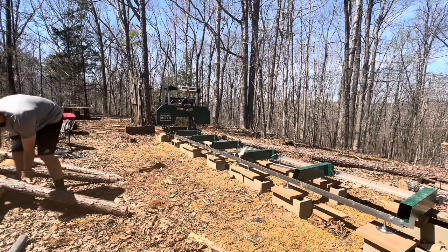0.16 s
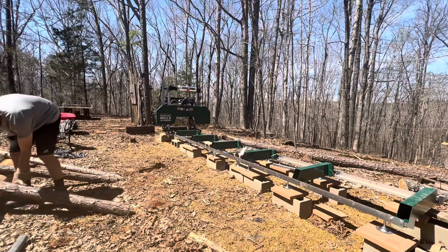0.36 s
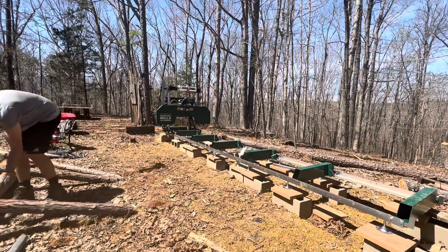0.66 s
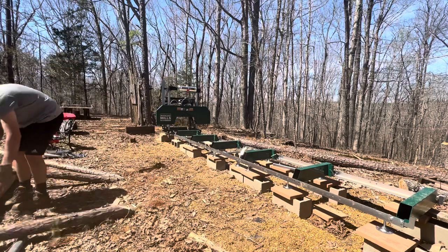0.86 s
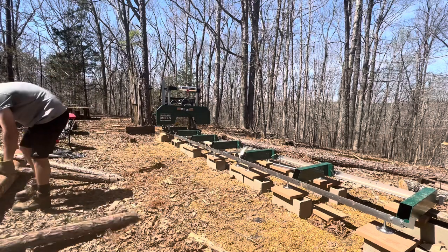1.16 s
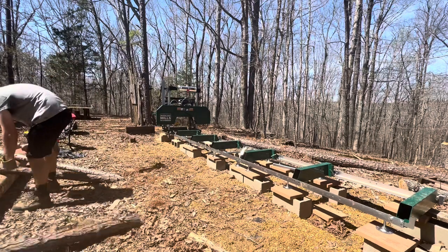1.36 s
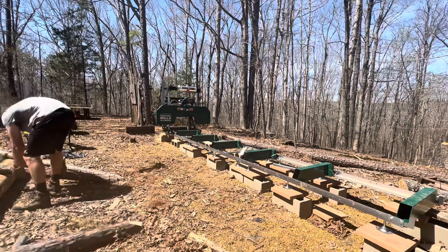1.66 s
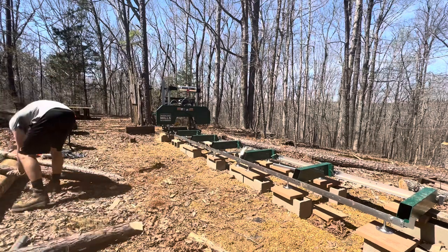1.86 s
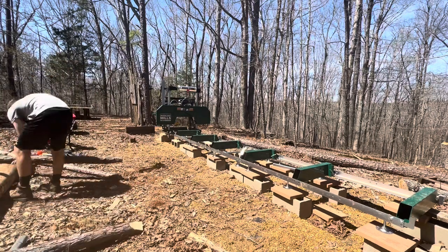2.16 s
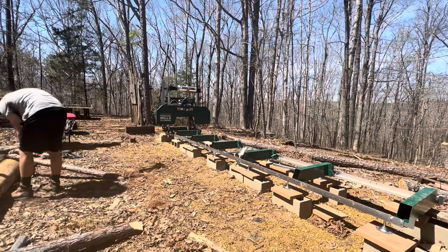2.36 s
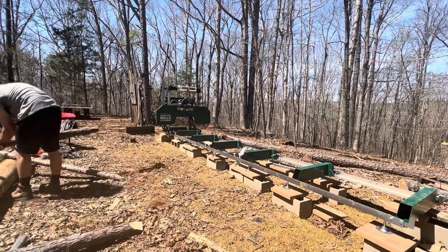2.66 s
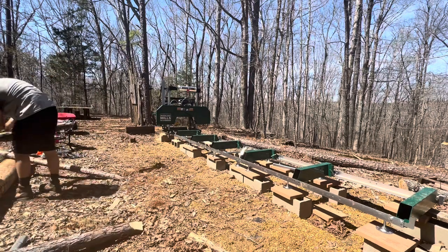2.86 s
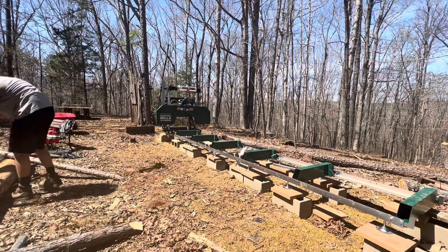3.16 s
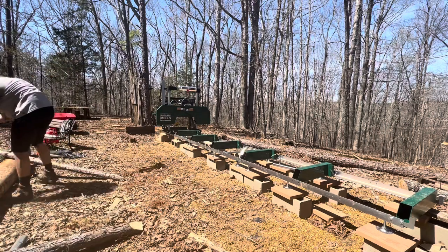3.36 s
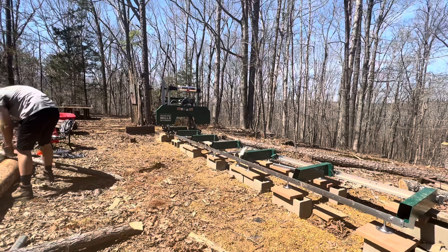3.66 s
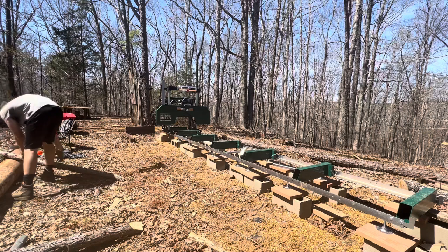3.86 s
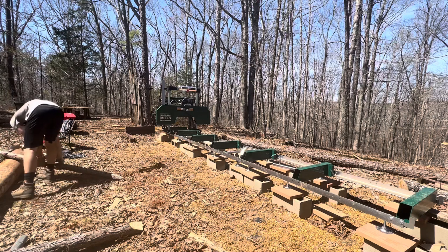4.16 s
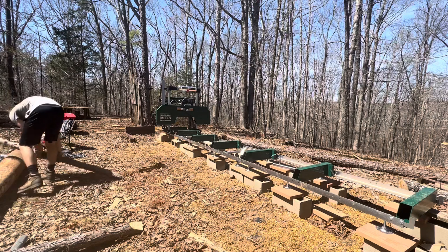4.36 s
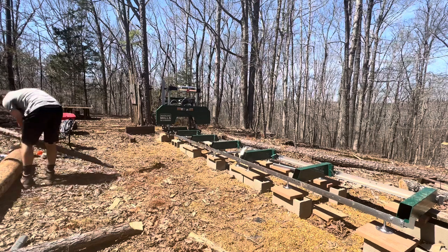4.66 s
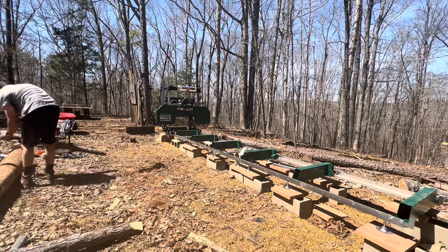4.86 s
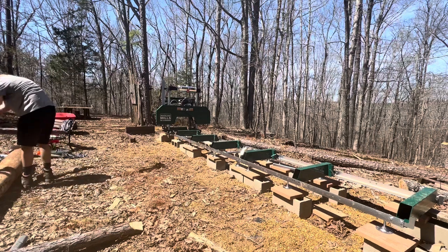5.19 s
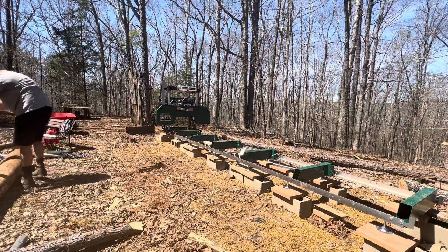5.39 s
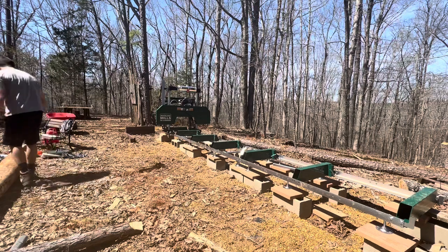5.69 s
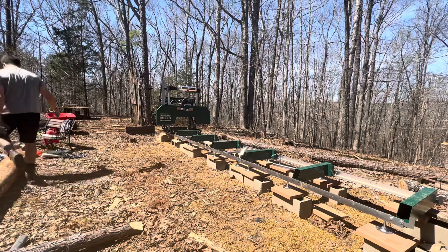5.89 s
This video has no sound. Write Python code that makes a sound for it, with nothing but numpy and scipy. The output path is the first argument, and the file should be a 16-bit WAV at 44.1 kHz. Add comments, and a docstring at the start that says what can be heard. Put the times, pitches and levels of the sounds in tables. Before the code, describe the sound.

Logs thud and knock with a hollow wooden ring onto dry leaves in woodland, with crunching steps, snapping twigs and scraping bark, mostly left.

```python
"""Logs land one after another on the leafy ground of a wood, with knocks, crunches and a wooden ring.
Most of it is heard from the left. Ringing sine waves make the logs and low sinking waves make the thuds.
Noise bursts make the crushed leaves and snapping twigs; clumps of tiny clicks and hiss make the
rustling leaves and scraping bark. Behind it are faint echoes off the trees and the rumble of light wind."""
import sys
import numpy as np
from scipy import signal
from scipy.fft import rfft, irfft, next_fast_len
from scipy.io import wavfile

SR = 44100
rng = np.random.default_rng(int(sys.argv[2]) if len(sys.argv) > 2 else 0)


def dump(signal):
    """Clip the signal to [-1, 1] and save it as 16-bit WAV at the path in sys.argv[1]."""
    limited = np.clip(np.atleast_2d(signal).T, -1, 1)
    pcm = np.round(limited * 32767).astype(np.int16)
    wavfile.write(sys.argv[1], SR, pcm)


N = 265878
SIZE = next_fast_len(N + SR)  # room for one second of echo
HZ = np.fft.rfftfreq(SIZE, 1 / SR)

# The ways each log bends and rings, listed by log name.
# Each row: frequency in Hz, level in dB, time to fade by 60 dB in seconds.
LOG_MODES = { "long": [(195.3, -10.5, 1), (347.8, 0, 0.53), (456, -27, .15), (525, -16, 0.32),
             (756, -13.5, 0.29), (820, -3, 0.16), (930, -11, .1)], "short": [(176, -5, .15),
             (303, -3, 0.084), (385, -5, 0.3), (480, 11.5, 0.0043), (633, -7.5, 0.18), (865, -29.5, .12),
             (1090, -21, .1)], "stacked": [(172, -17, 0.68), (264, -19, 0.34), (308, -15.5, 0.84),
             (418, -18, 0.47), (494, -20.5, 0.18), (622, -4, 0.11), (692, 3, 0.054), (692, -4.5, 0.054),
             (927, -21, 0.065), (960, -11, 0.142), (1098, -20.5, 0.12), (1290, -14, 0.24)],
             "dry": [(150, -16, 0.92), (228, -20.5, 1), (272.5, -3, 0.55), (437, 1.5, 0.28),
             (514, 0.5, 0.08), (573, 4.5, 0.08), (673.6, 4, 0.13), (783, -25.5, 0.15), (814, -7, 0.23),
             (992, 0.5, 0.066), (1260, -30, 0.087), (1470, -29, .15)]}
# Wood striking wood or ground. Each row: start in seconds, log name, ring level in dB, dead knock level in dB,
# knock pitch in Hz, contact time in seconds, seconds of free ringing before the log settles.
BLOWS = [(0.8023, "long", -25, -26, 610, 0.00039, 0.15), (0.838, "long", -23.5, -53, 300, 0.0014, 0.088),
         (2.1865, "short", -55, -46.5, 500, 0.00036, .1), (2.1923, "short", -35, -29, 480, 0.00034, .1),
         (3.3344, "stacked", -25, -7, 377, 0.00086, 0.38), (3.339, "stacked", -22, -6, 458, 0.00026, 0.39),
         (3.3797, "stacked", -23, -14.5, 603, 0.00024, 0.19),
         (4.2829, "short", -56, -47.5, 407, 0.00015, 0.1), (5.4899, "dry", -32.5, -12, 580, 0.00026, 0.33),
         (5.4955, "dry", -14.5, -21, 534, 0.00053, 0.1), (5.5035, "dry", -39, -18, 413, 0.0008, 0.32),
         (5.5425, "dry", -31, -20, 324, 0.00085, 0.071)]
# Logs and boots pushing on the soil. Each row: start in seconds, level in dB, middle of the sinking pitch in Hz.
THUDS = [(.803, -15, 131), (.81, -25, 72), (0.935, -31.5, 82), (1.059, -41, 111), (1.927, -36, 69),
         (2.275, -42.5, 61.3), (2.474, -42, 68), (2.656, -46, 84), (3.206, -51.5, 76), (3.337, -19, 171),
         (3.342, -25.5, 88), (3.385, -23, 131), (3.731, -43.5, 81), (4.064, -42, 107), (4.488, -42.5, 141),
         (4.506, -35, 69), (4.551, -42.5, 126), (5.208, -36, 111), (5.551, -26, 97), (5.891, -45.5, 120)]
# A log flattening the litter as it lands or bounces. Each row: start in seconds, crush level in dB,
# crush swell in seconds, resonance in Hz, stirred leaf level in dB, bark level relative to the leaves in dB,
# seconds in which the stirring builds up by 20 dB beforehand.
LANDINGS = [(0.7975, -15, 0.0015, 4040, -33, -3.5, 0.01), (3.315, -35, 0.0046, 4970, -45.5, -9, .004),
            (3.3263, -23, .0036, 4300, -28, -2.5, .008), (3.3796, -21, 0.0016, 2400, -43.5, 5.5, 0.028),
            (5.4897, -33, 0.0018, 5500, -42.5, 8, .004), (5.5429, -26.5, 0.0015, 5000, -40.5, 1, 0.0085)]
# The clearest twigs snapping. Each row: start in seconds, level in dB, resonance in Hz.
SNAPS = [(.06, -33, 5200), (.125, -42, 5060), (.161, -37, 3100), (.675, -36, 9000), (.756, -38, 6000),
         (1.052, -29.5, 4500), (1.111, -26.5, 5100), (1.142, -24.5, 4500), (1.157, -25, 7000),
         (1.206, -24, 5850), (1.3095, -27.5, 9200), (1.4353, -26.5, 9700), (1.504, -34.5, 4930),
         (1.7054, -29, 9400), (1.7396, -34.5, 3040), (1.75, -30.5, 7000), (1.8527, -26, 10500),
         (1.8998, -25.5, 4840), (2.042, -39, 4240), (2.194, -33, 9000), (2.4906, -49, 9040),
         (2.898, -49, 3000), (3.8086, -31, 2920), (3.871, -40, 4440), (3.896, -41, 1765),
         (4.0556, -43.5, 4100), (4.242, -37, 8200), (4.276, -45, 8100), (4.606, -40.5, 5700),
         (4.6692, -41, 1990), (4.714, -42, 5280), (5.655, -34, 4000), (5.7539, -31.5, 5270),
         (5.8385, -40.5, 5100), (5.852, -39, 2980), (5.871, -37.5, 8500)]
# Two long drags of a log through the litter, one list each.
# Each row: time in seconds, leaf level in dB before DRAG_LIFT_DB, bark level relative to the leaves in dB.
DRAGS = [
    [(0.87, -44.5, -4.5), (1.028, -42.5, -5), (1.05, -37.5, -6.5), (1.096, -39.5, -6), (1.144, -31.5, -5.5),
     (1.196, -42, -3), (1.208, -30.5, -4.5), (1.224, -41.5, -6), (1.546, -45.5, -5), (1.69, -50.5, -5)],
    [(3.42, -46.5, -5), (3.526, -45.5, -4), (3.55, -35.5, -3), (3.602, -42.5, -3.5), (3.788, -47, -2.5),
     (3.808, -40.5, -3.5), (3.842, -48.5, 0), (3.902, -47.5, -4), (3.982, -59.5, -2.5), (3.99, -55.5, -5.5)],
]
# Boots and log ends scuffing the litter. Each row: strongest moment in seconds, leaf level in dB,
# seconds to build by 20 dB, seconds to fade by 20 dB, bark level relative to the leaves in dB.
SCUFFS = [(.03, -49.5, .3, .18, 2.5), (.215, -55, .1, 0.25, -10), (0.567, -46, 0.21, .13, -1.5),
          (.78, -48.5, .28, .1, -8), (1.79, -45.5, 0.24, 0.27, -5.5), (1.905, -45, 0.06, 0.15, -5),
          (2.196, -48, 0.11, 0.069, 0.5), (2.258, -56.5, .1, 0.49, -6), (2.89, -63.5, 0.29, 0.18, 2.5),
          (3.011, -54, 0.059, 0.25, 2), (3.153, -56, 0.11, 0.024, 1), (3.235, -55.5, 0.061, 0.028, -26),
          (4.1, -49.5, 0.12, 0.29, -2.5), (4.28, -46.5, 0.23, 0.13, -4), (4.583, -52, 0.19, 0.17, -5),
          (4.681, -46, 0.04, 0.1, 2), (4.889, -59, 0.42, 0.2, -2), (5.149, -56.5, 0.15, 0.33, 0),
          (5.62, -42.5, .08, 0.16, -6), (5.76, -48.5, 0.053, 0.32, -4), (5.893, -38.5, 0.017, 0.023, 4.5),
          (5.97, -56.5, 0.43, 0.23, -1)]
# Colour of breaking litter and twigs. Each row: frequency in Hz, level in dB.
CRUSH_COLOUR = [(100, -22), (500, -6), (1200, -7), (2200, 1), (4500, 0.5), (8000, -6), (12000, -3.5),
                (16000, -2.5)]
# Colour of rustling leaves. Each row: frequency in Hz, level in dB.
LEAF_COLOUR = [(150, -29.5), (1200, -14), (2500, 0.5), (4000, -0.5), (6000, -1), (9000, -4), (12000, -4),
               (16000, -10)]
# Colour of scraping bark. Each row: frequency in Hz, level in dB.
BARK_COLOUR = [(60, -8), (150, -5.5), (400, -2.5), (800, -0.5), (1200, -4.5), (1900, 0.5), (2800, -1.5),
               (4500, -6.5), (12000, -17.5)]
# How late sound from the left reaches the right channel. Each row: frequency in Hz, phase lag in radians.
RIGHT_LAG = [(20, .4), (66, .55), (125, .7), (275, 1.4), (520, 1.95), (1150, 3.14), (1900, 4.9),
             (2500, 6.4), (3450, 9.4), (4300, 11.9), (5300, 13.4), (6000, 15.6), (7000, 18.7), (7700, 19),
             (8200, 17.3), (9400, 19.2), (10500, 15.9), (11100, 15.5), (12600, 12.6), (14400, 12.4),
             (15600, 10)]
# Colour of sound scattered off the nearby ground. Each row: frequency in Hz, level in dB.
GROUND_COLOUR = [(50, -19.5), (500, -10.5), (1200, -28.5), (2500, -8), (6000, -10), (16000, -13.5)]
# Colour of the tree trunks' echo. Each row: frequency in Hz, level in dB.
TREE_COLOUR = [(40, -6.5), (200, 8), (600, 0), (2000, 2.5), (6000, 7), (16000, -9)]
# Colour of the wind and woods. Each row: frequency in Hz, level in dB.
AIR_COLOUR = [(15, -34), (35, -0.5), (60, 5), (100, 5), (160, -11), (300, -18.5), (1000, -25), (2500, -72),
              (8000, -93), (16000, -43.5)]
# How the low wind rumble comes and goes. Each row: time in seconds, level in dB.
BREEZE = [(0, -74), (.7, -68), (1.5, -59), (2.5, -61.5), (3.2, -61), (4.2, -59), (5, -62), (6, -53.5)]
# Uneven tone colour of the left and right channels, with narrow treble dips.
# Each row: frequency in Hz, left level in dB, right level in dB.
CHANNEL_COLOUR = [(29.1, 10.5, 4), (120, 0.1, 0.3), (276, 0, 0), (523, 3, 0), (1050, 4, 2),
                  (1650, 0.5, -1.5), (2430, -4, -5), (3470, 0, -3), (4960, 2, -14.5), (5100, 4, -1.5),
                  (5190, -5.5, -6.5), (5560, 8, -12.5), (7000, -0.5, 1.5), (7840, -1.5, -15), (8120, 9, -5),
                  (9400, 0.5, 2.5), (10830, -4.5, -8), (11670, 4.5, -2.5), (12800, -10, 1.5),
                  (14600, 1, -6), (16350, -0.5, -11)]

THUD_SWELL_CYCLES = 0.65  # a deeper thud also swells more slowly
SNAP_SWELL_CYCLES = 4.5  # a higher snap swells more quickly
SETTLE_S = 0.11  # leaves stirred by a landing fall by 20 dB in this time
DRAG_LIFT_DB, DRAG_EDGE_S = 1, 0.08  # a drag starts and stops by 20 dB in the edge time
# Lesser twigs break at random times, with loudness set by how hard the leaves are stirred just then.
TWIGS_PER_S, TWIG_OVER_DB, TWIG_SPREAD_DB = 7.5, 2, -6
TWIG_HZ, TWIG_OCTAVES = 5500, 0.73  # typical resonance and its random spread
TOP_EDGE_HZ = 15950


def amp(db):
    """Turns decibels into gain."""
    return 10 ** (np.asarray(db) / 20)


def unit(x):
    """Scales a sound to an average (rms) strength of 1."""
    return x / np.sqrt(np.mean(x ** 2) + 1e-20)


def read(points, hz, axis=1):
    """Reads one table column at any frequency, sliding between rows on a log-frequency scale."""
    table = np.array(points, float)
    return np.interp(np.log(hz + 1), np.log(table[:, 0] + 1), table[:, axis])


def shape(x, gain):
    """Filters a sound by a gain given at each frequency of HZ."""
    return irfft(rfft(x, SIZE) * gain, SIZE)[..., :N]


def add(mix, s, sound):
    """Lays a sound into the mix at time s, cutting off whatever runs past the end."""
    start = max(round(s * SR), 0)
    part = mix[..., start:][..., :sound.shape[-1]]
    part += sound[..., :part.shape[-1]]


def swell(t, rise):
    """Rises to 1 in the given time, then dies away."""
    return t / rise * np.exp(1 - t / rise)


def log_ring(modes, t, split=0.022, second_plane=0.12):
    """A log is not quite round: it bends in two planes, so each mode is a close, beating pair."""
    ring = 0
    for hz, db, t60 in modes:
        first = np.cos(2 * np.pi * hz * t)
        second = second_plane * np.cos(2 * np.pi * hz * (1 - split) * t)
        ring = ring + amp(db - 60 * t / t60) * (first + second)
    return ring / (1 + second_plane)


def log_blows(knock_cycles=0.83, dull_db=-19, dull_t60=0.16, settled_t60=0.22, pile_low=0.42, pile_high=1.45):
    """Each blow gives a dead knock and sets the log ringing; a longer contact spares the high modes."""
    out, t = np.zeros(N), np.arange(SR) / SR
    for s, log, ring_db, knock_db, knock_hz, contact, free in BLOWS:
        ring = log_ring(LOG_MODES[log], t)
        # once the log settles, its ring fades faster
        ring *= amp(-60 * np.maximum(t - free, 0) / settled_t60)
        knock = swell(t, knock_cycles / knock_hz) * np.sin(2 * np.pi * knock_hz * t)
        # the wood underneath answers with many crowded, damped modes: a fading band of noise
        band = [pile_low * knock_hz, pile_high * knock_hz]
        band_filter = signal.butter(2, band, "band", fs=SR, output="sos")
        pile = unit(signal.sosfilt(band_filter, rng.standard_normal(SR)))
        knock += pile * amp(dull_db - 60 * t / dull_t60)
        force = swell(t[:600], contact / 2) ** 2
        wood = amp(ring_db) * ring + amp(knock_db) * knock
        add(out, s, signal.fftconvolve(wood, force / force.sum()))
    return out


def soil_thuds(sag=0.44):
    """A few low cycles that sink in pitch as the ground gives way."""
    out, t = np.zeros(N), np.arange(SR // 2) / SR
    for s, db, hz in THUDS:
        rise = THUD_SWELL_CYCLES / hz
        pitch = hz * (1 - sag + 2 * sag * np.exp(-t / (2 * rise)))
        wave = np.sin(2 * np.pi * np.cumsum(pitch) / SR)
        add(out, s, amp(db) * swell(t, rise) * wave)
    return out


def crackle(per_s, spread_db, hiss, apart=0.39, grain_s=0.00057, count=12):
    """Tiny fractures of very unequal size over a hiss; each kind has its own colour and place."""
    t = np.arange(160) / SR
    shared = rng.standard_normal((count, 1, len(t)))
    separate = apart * rng.standard_normal((count, 2, len(t)))  # differs left and right
    kinds = (shared + separate) * np.exp(-t / grain_s)
    sizes = amp(spread_db * np.minimum(rng.exponential(1, N), 4))
    clicks = sizes * rng.choice([-1, 1], N) * (rng.random(N) < per_s / SR)
    kind = rng.integers(0, count, N)
    grains = np.zeros((2, N))
    for k in range(count):
        chosen = (clicks * (kind == k))[None]
        grains += signal.oaconvolve(chosen, unit(kinds[k]), axes=1)[:, :N]
    noise = rng.standard_normal(N) + apart * rng.standard_normal((2, N))
    return unit(unit(grains) + hiss * noise)


def breaks(leaf_level, count=200):
    """Lists all that breaks: litter under a landing log, clear snaps and chance twigs."""
    # each entry: start in seconds, gain, swell in seconds, resonance in Hz
    crushed = [(s, amp(db), rise, hz) for s, db, rise, hz, *_ in LANDINGS]
    twigs = [(s, amp(db), hz) for s, db, hz in SNAPS]
    places = rng.integers(0, N, count)
    draws = rng.standard_normal((count, 2))
    wanted = round(TWIGS_PER_S * N / SR)
    for at, (strength, pitch) in list(zip(places, draws))[:wanted]:
        gain = leaf_level[at] * amp(TWIG_OVER_DB + TWIG_SPREAD_DB * strength)
        twigs.append((at / SR, gain, TWIG_HZ * 2 ** (TWIG_OCTAVES * pitch)))
    return crushed + [(s, gain, SNAP_SWELL_CYCLES / hz, hz) for s, gain, hz in twigs]


def crunches(leaf_level, size=4096, count=256, focus_db=8, focus_octaves=0.62, snap_db=2, snap_s=0.00017):
    """A sharp break, then a short burst of fractures, boosted where the broken piece resonates."""
    out, t, hz = np.zeros((2, N)), np.arange(size) / SR, np.fft.rfftfreq(size, 1 / SR)
    fractures = crackle(per_s=12000, spread_db=2.0, hiss=1.0, apart=0.25)
    excerpts = rng.integers(0, N - size, count)  # each break uses a random stretch of fractures
    for (s, gain, rise, centre_hz), at in zip(breaks(leaf_level), excerpts):
        octaves_away = np.log2((hz + 1) / centre_hz)
        resonance = focus_db * np.exp(-(octaves_away / focus_octaves) ** 2)
        colour = unit(amp(read(CRUSH_COLOUR, hz) + resonance))
        burst = irfft(rfft(fractures[:, at:at + size]) * colour)
        envelope = np.maximum(swell(t, rise), amp(snap_db) * swell(t, snap_s))
        add(out, s, gain * envelope * burst)
    return out


def stirring():
    """How hard leaves and bark are rubbed: scuffs, landings and drags build, fade and add as powers."""
    t = np.arange(0, N, 32) / SR  # a coarse clock is enough for these slow curves

    def stroke(start, end, db, build, fade, bark_db):
        """Power of the leaves and of the bark in one movement."""
        before, after = np.maximum(start - t, 0), np.maximum(t - end, 0)
        level = db - 20 * (before / build + after / fade)
        return amp([level, level + bark_db]) ** 2

    power = np.zeros((2, len(t)))
    for s, db, build, fade, bark_db in SCUFFS:
        power += stroke(s, s, db, build, fade, bark_db)
    for s, _, _, _, db, bark_db, ahead in LANDINGS:
        power += stroke(s, s, db, ahead, SETTLE_S, bark_db)
    for drag in DRAGS:
        s, db, bark_db = np.transpose(drag)
        leaf_db = np.interp(t, s, db) + DRAG_LIFT_DB
        power += stroke(s[0], s[-1], leaf_db, DRAG_EDGE_S, DRAG_EDGE_S, np.interp(t, s, bark_db))
    return [np.interp(np.arange(N) / SR, t, np.sqrt(p)) for p in power]


def litter(leaf_level, bark_level, leaf_db=0.0, bark_db=1, clump_db=2.0, clump_hz=45):
    """Leaves crackle and bark scrapes in stick-slip clumps, as hard as the log or boot moves."""
    slips = unit(shape(rng.standard_normal(N), 1 / (1 + (HZ / clump_hz) ** 2)))
    clumps = amp(clump_db * np.clip(slips, -2, 2))
    leaf_grains = clumps * crackle(per_s=2000, spread_db=4.5, hiss=0.97, apart=0.44, count=20)
    leaves = unit(shape(leaf_grains, amp(read(LEAF_COLOUR, HZ))))
    bark_grains = clumps * crackle(per_s=1500, spread_db=3.0, hiss=1.0, apart=0.29)
    bark = unit(shape(bark_grains, amp(read(BARK_COLOUR, HZ))))
    return amp(leaf_db) * leaf_level * leaves + amp(bark_db) * bark_level * bark


def reflections(x, colour, t60, delay):
    """Sparse echoes of random sign begin after the delay, die away and differ left and right."""
    t = np.arange(SR) / SR
    present = rng.random((2, SR)) < 4000 / SR  # about 4000 echoes a second
    taps = rng.standard_normal((2, SR)) * present * (t > delay) * amp(-60 * t / t60)
    taps /= np.linalg.norm(taps, axis=1, keepdims=True) + 1e-20
    return shape(x, rfft(taps, SIZE) * amp(read(colour, HZ)))


def air(apart=1.0, left_db=3):
    """Low rumble of light wind with a faint hiss of the woods; it is louder on the left."""
    noise = rng.standard_normal(N) + apart * rng.standard_normal((2, N))
    level = np.interp(np.arange(N) / SR, *np.transpose(BREEZE))
    coloured = shape(noise * amp([[left_db], [0]]), amp(read(AIR_COLOUR, HZ)))
    return amp(level) * unit(coloured)


def scene(echo_db=-26):
    """All the work happens on the left; the ground and the trunks scatter some of it back."""
    leaf_level, bark_level = stirring()
    work = log_blows() + soil_thuds() + crunches(leaf_level) + litter(leaf_level, bark_level)
    late_right = shape(work[1], np.exp(-1j * read(RIGHT_LAG, HZ)))
    direct = np.array([work[0], late_right])
    ground = reflections(work, GROUND_COLOUR, t60=0.054, delay=0.00039)
    trees = amp(echo_db) * reflections(work, TREE_COLOUR, t60=0.84, delay=0.025)
    return direct + ground + trees + air()


def record(dry, low_cut_hz=38):
    """Gives each channel its uneven tone colour, then trims the deepest bass and the highest treble."""
    channel_db = [read(CHANNEL_COLOUR, HZ, axis=1), read(CHANNEL_COLOUR, HZ, axis=2)]
    coloured = shape(dry, amp(channel_db))
    bass_cut = signal.butter(2, low_cut_hz, "high", fs=SR, output="sos")
    trimmed = signal.sosfilt(bass_cut, coloured)
    treble_cut = signal.firwin(511, TOP_EDGE_HZ, window=("kaiser", 9), fs=SR)
    return signal.oaconvolve(trimmed, treble_cut[None], "same")


dry = scene()
out = record(dry)
dump(out)
```